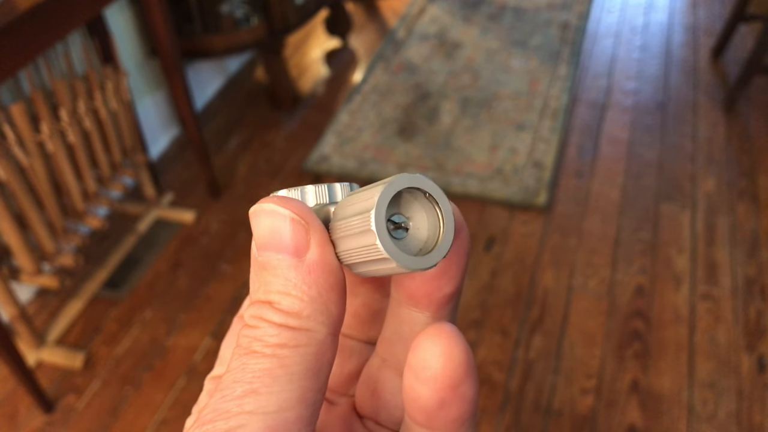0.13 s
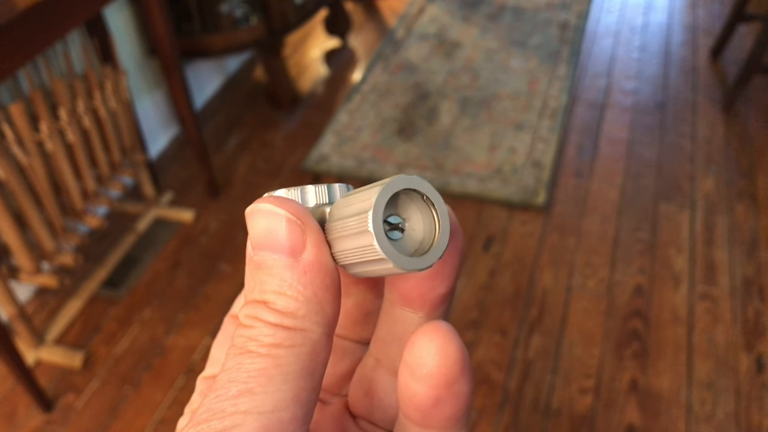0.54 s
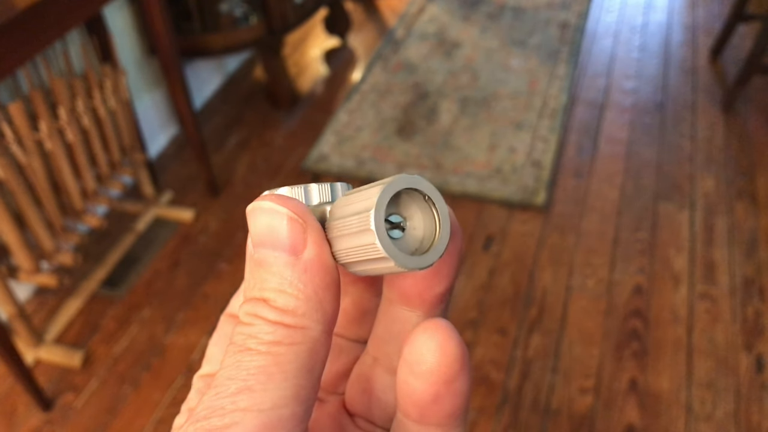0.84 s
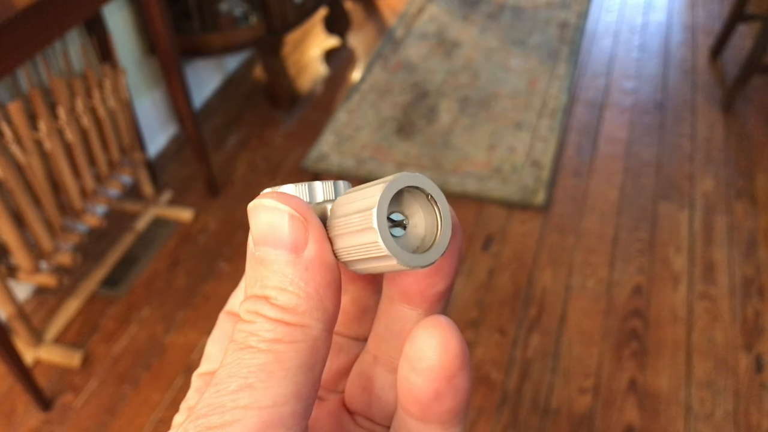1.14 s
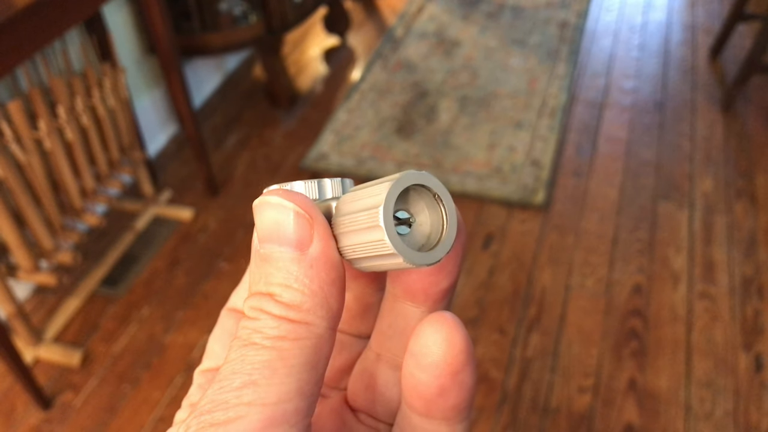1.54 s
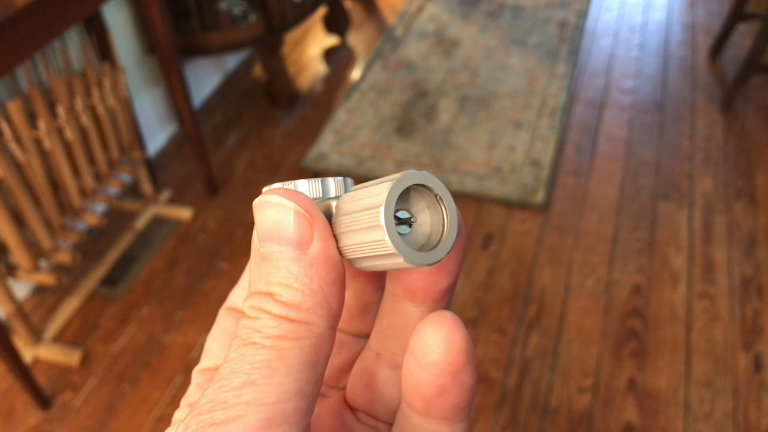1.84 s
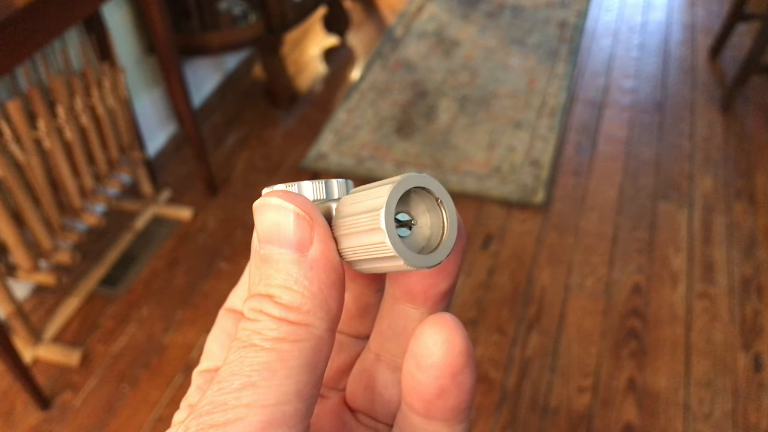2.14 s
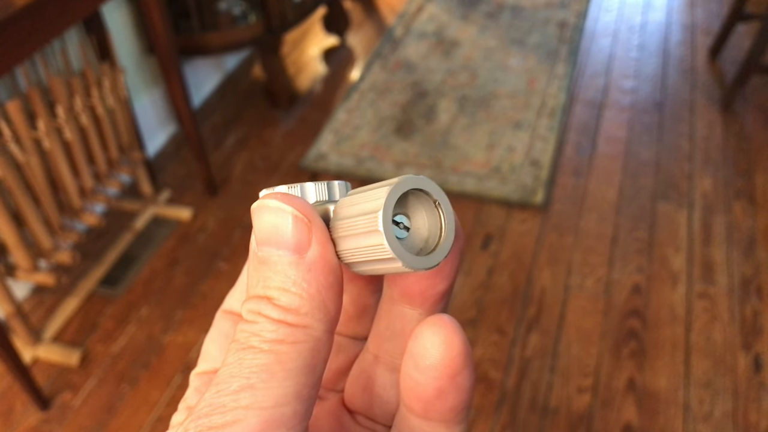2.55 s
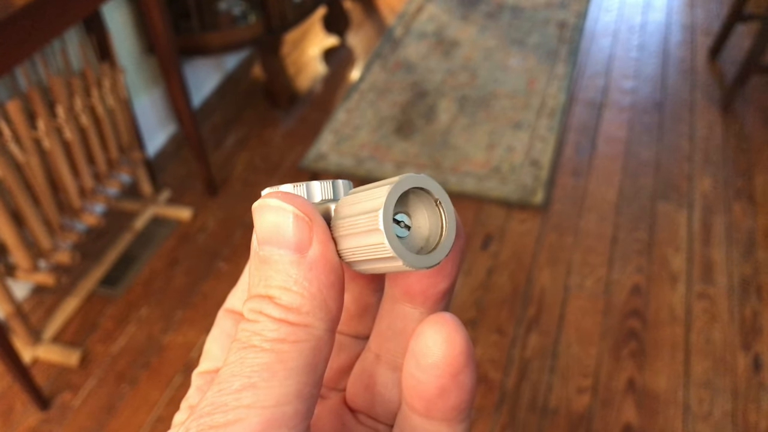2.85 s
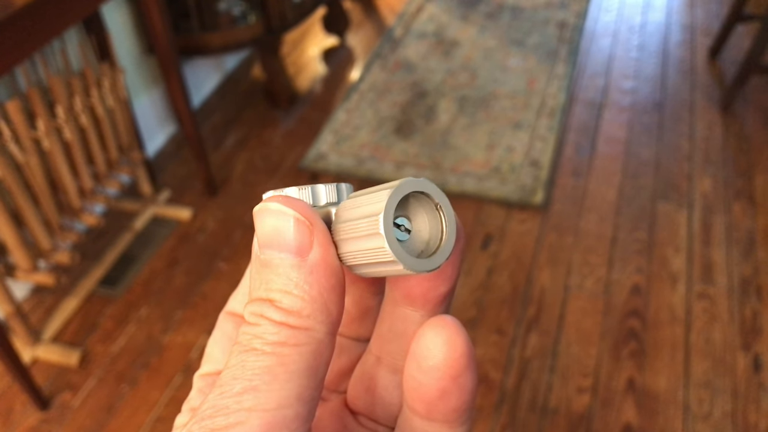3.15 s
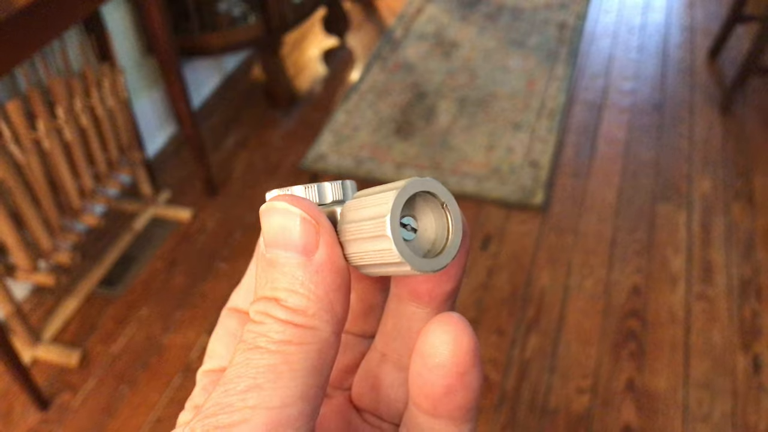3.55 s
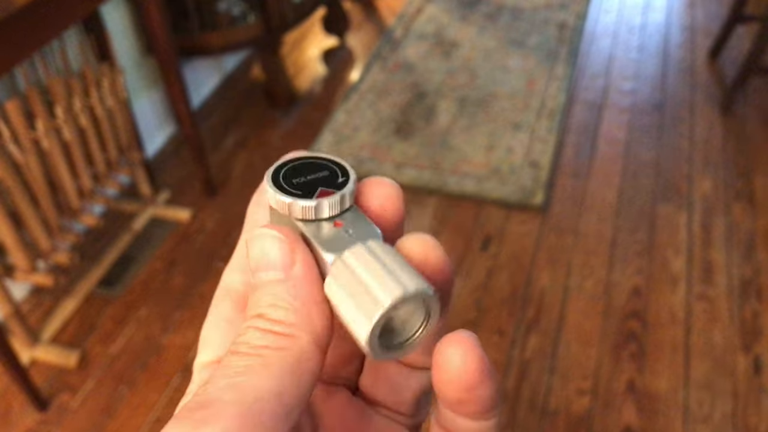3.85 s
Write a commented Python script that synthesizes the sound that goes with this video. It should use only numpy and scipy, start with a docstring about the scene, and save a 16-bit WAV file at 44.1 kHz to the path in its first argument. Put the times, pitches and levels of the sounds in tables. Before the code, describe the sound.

Clockwork timer whirring close up, with one sharp click, until it stalls in a quiet room.

```python
"""Clockwork self-timer running down

A small timer whirs between finger and thumb, close up in a quiet room. Its escapement chatters
tick-tock through the metal case, dragging once a turn where a gear binds. A catch snaps over once;
later the works stall, leaving the room's hum and a faint rustle of the fingers."""
import sys
import numpy as np
from scipy import signal
from scipy.fft import rfft, irfft, next_fast_len
from scipy.io import wavfile
from scipy.ndimage import map_coordinates

SR = 44100
rng = np.random.default_rng(int(sys.argv[2]) if len(sys.argv) > 2 else 0)


def store_pcm(level_fs):
    """Save levels as 16-bit WAV."""
    pcm = np.round(np.clip(level_fs, -1, 1) * 32767).astype(np.int16)
    wavfile.write(sys.argv[1], SR, np.atleast_2d(pcm).T)


N = 176400
T = np.arange(N) / SR
FFT_SIZE = next_fast_len(N + SR)
HZ = np.fft.rfftfreq(FFT_SIZE, 1 / SR)

# case resonances (frequency [Hz], width [Hz], tick level [dB], tock level [dB], catch level [dB])
CASE_MODES = [(1868, 478, -5, -7, 0.5), (2256, 460, 3, -4.5, -13.5), (2871, 492, 4, -3, -0.5),
              (3660, 480, -29, -13, -5.5), (4052, 470, -6, -2.5, 7.5), (5728, 344, -1, -3.5, -2),
              (5740, 310, -13, -15.5, -8.5), (6590, 1100, 0.5, -5, -14), (8550, 800, -2.5, -3.5, -28),
              (9670, 640, 0, -4, 0), (10970, 840, 0.5, -7.5, 5.5), (12360, 970, 4, 1, -7.5),
              (14270, 1200, -2, 3, -9.5), (16010, 1360, 6, 0, -1.5)]


def escapement():
    """Ticks, tocks and gear hiss ring the case, dragging at a tight spot each turn until they stall."""
    # drive of the spring (time [s], free-running rate [cycles/s], level [dB])
    spring_drive = [(0, 189, -34), (.6, 184, -33), (1.2, 169, -33.5), (1.6, 163.6, -34), (2.25, 169, -33),
                    (2.5, 160, -32.5), (2.9, 174, -31.5), (3.34, 166, -32.5)]
    turn_s, first_bind_s, bind_width_s, bind_hz, bind_db = .382, .35, .032, 11, .86
    flutter_hz, flutter_db = 3, .22
    stall_s, slowing_s, fade_db_per_s = 3.3474, .095, 527
    tock_lag = .55  # share of a cycle
    free_rate, level_db = curves(spring_drive)
    from_bind = (T - first_bind_s + turn_s / 2) % turn_s - turn_s / 2
    bind = np.exp(-.5 * (from_bind / bind_width_s) ** 2)
    flutter = wobble(22)  # uneven teeth
    stalled_s = np.maximum(T - stall_s, 0)
    rate = (free_rate - bind_hz * bind + flutter_hz * flutter) * np.exp(-stalled_s / slowing_s)
    cycles = np.cumsum(rate) / SR
    force = amp(flutter_db * flutter - bind_db * bind - fade_db_per_s * stalled_s)
    ticks = unit(pallet(cycles, scatter_db=.35, rattle=1.2))
    tocks = unit(pallet(cycles - tock_lag, scatter_db=-.2, rattle=2.48))
    gear_hiss = amp(-12) * rng.standard_normal(N)
    _, _, tick_db, tock_db, _ = np.transpose(CASE_MODES)
    tick_ring = filtered(force * (ticks + gear_hiss), case(tick_db))
    tock_ring = filtered(force * tocks, case(tock_db))
    return amp(level_db) * shifting_colour(unit(tick_ring + tock_ring), turn_s)


def pallet(cycles, scatter_db, rattle, contacts=14, rattle_s=.00055, lead_s=.00015, jitter_s=.00009):
    """Once a cycle a tooth strikes the pallet, amid a brief rattle of lighter contacts."""
    beats = np.interp(np.arange(1, int(cycles[-1])), cycles, T)
    draws = rng.standard_normal((800, 3, contacts + 1))[:len(beats)]
    times = beats[:, None] + jitter_s * draws[:, 0, :1]
    sizes = amp(scatter_db * draws[:, 1, :1])
    delays = rattle_s * np.hypot(draws[:, 0, 1:], draws[:, 1, 1:]) ** 2 / 2 - lead_s
    light_hits = impulses(times + delays, sizes * np.sign(draws[:, 2, 1:]) / np.sqrt(contacts))
    low_cut = signal.butter(2, 3860, "high", fs=SR)  # too light to move the low resonances
    return impulses(times, sizes) + rattle * signal.lfilter(*low_cut, light_hits)


def case(levels_db, low_cut_hz=1050, damping=1, in_step_below_hz=0):
    """Response of the metal case; a direct blow starts its lower resonances in step."""
    # where the case radiates least (frequency [Hz], half width [Hz], gain [dB])
    hollows = [(7715, 435, -6.5), (10010, 130, -5)]
    ring = 0
    for k, ((hz, width, *_), db) in enumerate(zip(CASE_MODES, levels_db)):
        loss = 1j * HZ * width * damping
        sign = 1 if hz < in_step_below_hz else (-1) ** k
        ring = ring + sign * amp(db) * loss / (hz * hz - HZ ** 2 + loss)
    hollow_db = sum(db * np.exp(-((HZ - hz) / width) ** 2) for hz, width, db in hollows)
    low_cut = signal.butter(5, low_cut_hz, "high", fs=SR)  # so small a case radiates no bass
    return ring * amp(hollow_db) * signal.freqz(*low_cut, worN=HZ, fs=SR)[1]


def shifting_colour(buzz, turn_s, pulses_per_turn=4, pulse_db=1.5, crest_s=.382):
    """Five bands of the buzz drift in level, and the middle one pulses with the gear."""
    # borders of the bands (frequency [Hz])
    edges = [0, 2700, 3300, 4900, 10400, 22050]
    # ring below 2.7 kHz (time [s], gain [dB])
    lowest_ring = [(0, 4.5), (.6, 0.5), (1.3, 0.3), (2.35, 1), (2.43, -3.5), (2.85, -1.5), (3.05, -0.5),
                   (3.3, -0.5)]
    # ring at 2.7-3.3 kHz (time [s], gain [dB])
    low_ring = [(0, 2.5), (.6, 1.4), (1.3, -0.2), (2.35, -2.5), (2.45, -1), (3.3, -2)]
    # ring at 3.3-4.9 kHz (time [s], gain [dB])
    mid_ring = [(0, 3), (.5, 2), (.77, 2.5), (.85, -1.5), (1, 1.5), (1.9, 1), (2.36, 2), (2.55, -4),
                (3.3, -2.5)]
    # ring at 4.9-10.4 kHz (time [s], gain [dB])
    high_ring = [(0, -1), (.9, -2), (.96, 0.9), (1.9, 2), (2.25, -1.5), (2.7, -0.5), (3.3, -0.7)]
    # sizzle above 10.4 kHz (time [s], gain [dB])
    sizzle = [(0, -0.5), (0.699, -1), (1.5, -2.5), (2.3, -4), (3.299, -3)]
    gains_db = [curves(band)[0] for band in (lowest_ring, low_ring, mid_ring, high_ring, sizzle)]
    gains_db[2] += pulse_db * np.cos(2 * np.pi * pulses_per_turn * (T - crest_s) / turn_s)
    bands = zip(edges, edges[1:], gains_db)
    return sum(amp(db) * filtered(buzz, (HZ >= low) & (HZ < high)) for low, high, db in bands)


def catch(gain_db=7, scrape=.45):
    """The catch slips, snaps over and bounces: dry blows on the case, each with a short scrape."""
    # contacts of the catch (time [s], relative level [dB], scrape decay [s])
    contacts = [(2.3901, -18, .0006), (2.3907, -12.5, 0.00053), (2.391, -1, .0004), (2.3933, -22, .0006),
                (2.3941, -6, 0.00034)]
    blows, t = np.zeros(N), T[:SR // 100]
    for start_s, db, decay_s in contacts:
        blow = rng.standard_normal(len(t)) * np.exp(-t / decay_s)
        blow *= scrape / np.linalg.norm(blow)
        blow[0] = 1  # the impact itself
        blows[round(start_s * SR):][:len(t)] += amp(db + gain_db) * blow
    catch_db = np.transpose(CASE_MODES)[-1]
    return filtered(blows, case(catch_db, low_cut_hz=1870, damping=1.09, in_step_below_hz=8000))


def room(timer, scatter_db=-16, scatter_s=.0081, tail_db=-15.5):
    """A quick scatter off hand and furniture, then the room's soft tail."""
    # reverb decay (frequency [Hz], time to fall 60 dB [s])
    decay_times = [(500, .35), (3000, 0.26), (8000, 0.31), (15000, .25)]
    scatter = rng.standard_normal(N) * np.sqrt(T) * np.exp(-T / scatter_s)
    hz, t, noise = signal.stft(rng.standard_normal(SR // 2), SR, nperseg=256)
    decay = amp(-60 * t / along(decay_times, hz)[:, None])
    _, tail = signal.istft(noise * decay, SR, nperseg=256)
    early = amp(scatter_db) * rfft(scatter / np.linalg.norm(scatter), FFT_SIZE)
    late = amp(tail_db) * rfft(tail / np.linalg.norm(tail), FFT_SIZE)
    return filtered(timer, early + late)


def fingers(level_db=-65, roughness_db=2.5):
    """Skin rubs faintly and unevenly on the knurled metal."""
    # colour of the rub (frequency [Hz], relative level [dB])
    rub_colour = [(2000, -16), (8000, -21), (11500, -12.5), (13000, -6), (15500, -5.5)]
    rub = amp(roughness_db * wobble(81)) * rng.standard_normal(N)
    return amp(level_db) * unit(filtered(rub, amp(along(rub_colour, HZ))))


def house(air_db=-56, rumble_cut_hz=36):
    """A bed of low room tone with a swelling drone and wavering lines of hum."""
    # colour of the room tone (frequency [Hz], relative level [dB])
    room_tone = [(25, -15), (48, -2), (90, -14.5), (145, -4), (185, -13.5), (235, -8), (320, -16),
                 (480, -23), (800, -24), (1200, -28), (2000, -38.5), (7700, -53), (15500, -66)]
    # swells of the drone (time [s], level [dB])
    swells = [(0, -62.5), (.38, -59), (.55, -70), (.88, -54), (1.05, -65.5), (1.7, -61), (2.05, -65),
              (2.25, -56), (2.46, -74), (2.72, -56), (2.85, -57.5), (3.05, -61), (3.35, -55), (3.48, -67),
              (3.64, -54.5), (3.75, -61), (4, -65)]
    # hum of the house (frequency [Hz], level [dB], unsteadiness [0-1])
    hum_lines = [(119.4, -65.5, .3), (239.6, -70.5, 0.5), (374.7, -77, 0.3), (844, -75, 0.18),
                 (1190, -83.5, 0.6)]
    colour = amp(along(room_tone, HZ)) * HZ ** 4 / (HZ ** 4 + rumble_cut_hz ** 4)
    air = amp(air_db) * unit(filtered(rng.standard_normal(N), colour))
    drone = amp(curves(swells)[0]) * wavering(hz=142.4, unsteadiness=.31)
    hum = sum(amp(db) * wavering(hz, unsteadiness) for hz, db, unsteadiness in hum_lines)
    return air + drone + hum


def wavering(hz, unsteadiness, rate=14):
    """A tone of rms 1 that drifts in strength and phase."""
    drift = 1 - unsteadiness + unsteadiness * (wobble(rate) + 1j * wobble(rate))
    return unit(np.real(drift * np.exp(2j * np.pi * hz * T)))


def wobble(rate):
    """A smooth random curve, rate knots a second."""
    return map_coordinates(rng.standard_normal(4096), [T * rate], mode="mirror")


def impulses(times, sizes):
    """One-sample clicks at the given times in seconds."""
    samples = np.clip(times * SR, 0, N - 1).astype(int)
    return np.bincount(samples.ravel(), sizes.ravel(), N)


def amp(db):
    """Decibels to gain."""
    return 10 ** (np.asarray(db) / 20)


def unit(x):
    """Scaled to rms 1."""
    return x / np.sqrt(np.mean(x ** 2) + 1e-20)


def along(points, hz):
    """A curve through (frequency, value) points on a log frequency axis."""
    knots_hz, values = np.transpose(points)
    return np.interp(np.log(hz + 1), np.log(knots_hz + 1), values)


def curves(rows):
    """An envelope for each column after the time."""
    times, *columns = np.transpose(rows)
    return [np.interp(T, times, column) for column in columns]


def filtered(x, response):
    """x shaped by a frequency response on the HZ grid."""
    return irfft(rfft(x, FFT_SIZE) * response, FFT_SIZE)[:N]


def scene():
    """The timer in the hand, in the room, in mono."""
    timer = escapement() + catch()
    return (timer + room(timer) + fingers() + house())[None]


def record(dry):
    """A steep high cut takes off the very top."""
    top_hz = 15800
    return filtered(dry[0], HZ < top_hz)[None]


dry = scene()
out = record(dry)
store_pcm(out)
```